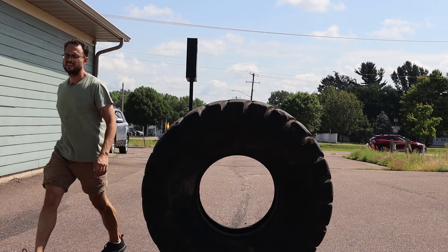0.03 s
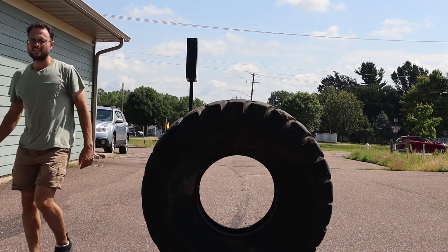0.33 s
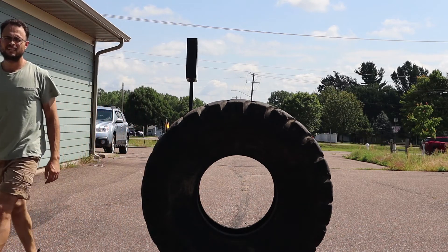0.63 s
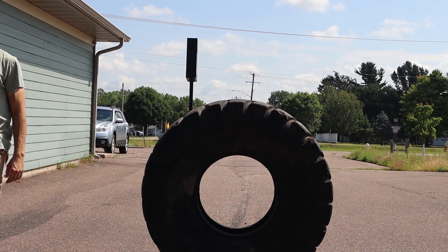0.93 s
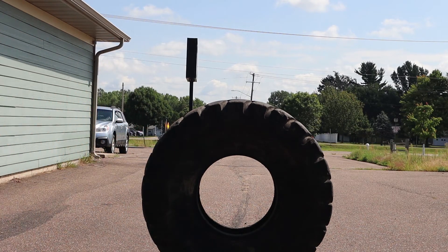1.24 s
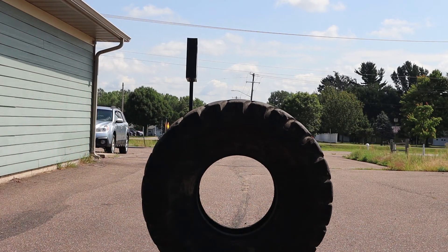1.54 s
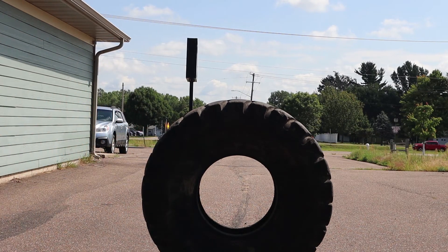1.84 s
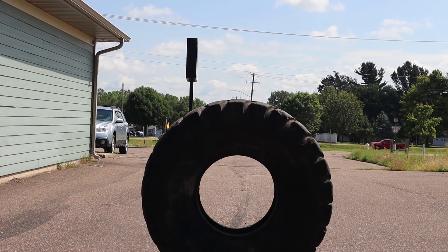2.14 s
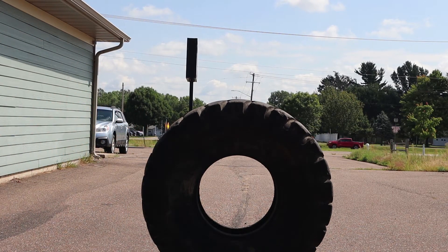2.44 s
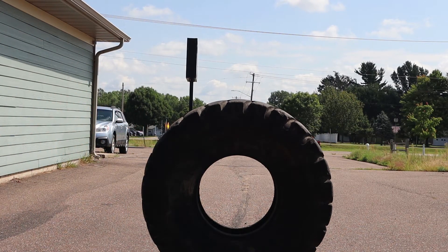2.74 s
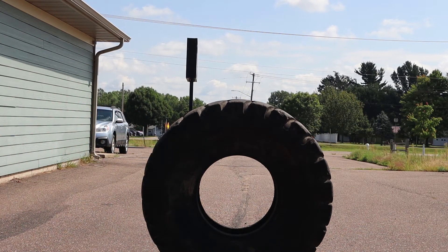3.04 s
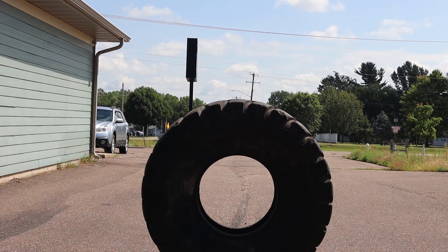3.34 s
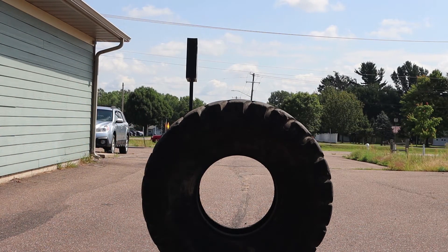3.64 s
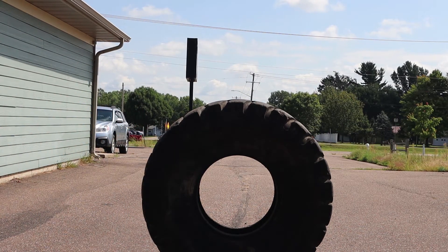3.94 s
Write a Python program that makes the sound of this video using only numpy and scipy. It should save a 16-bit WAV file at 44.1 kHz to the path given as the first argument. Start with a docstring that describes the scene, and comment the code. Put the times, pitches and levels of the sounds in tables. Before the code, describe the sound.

Low wind rumble on the microphone, with far-off traffic and faint shoe scuffs behind.

```python
"""Wind on a microphone: gusts break into eddies, with sharper slaps and one dull thump.
Behind it, a paved lot in summer: distant tyre noise, a steady machine hum, faint rustling,
crickets and a higher insect in the grass. Someone walks off over asphalt, soles scuffing
and cracking grit. The microphone is mono in the bass and very wide in the treble."""
import sys
import numpy as np
from scipy import signal
from scipy.fft import rfft, irfft, next_fast_len
from scipy.io import wavfile
from scipy.ndimage import uniform_filter1d, map_coordinates

SR = 44100
rng = np.random.default_rng(int(sys.argv[2]) if len(sys.argv) > 2 else 0)


def store_wav(level_fs):
    """Save 16-bit WAV to argv[1]."""
    pcm = np.round(np.clip(np.atleast_2d(level_fs), -1, 1) * 32767)
    wavfile.write(sys.argv[1], SR, pcm.T.astype(np.int16))


N = 176400
T = np.arange(N) / SR

# wind strength: t/s, level/dB
GUST_LEVELS = [(0,-43),(.38,-44),(.5,-30.5),(.6,-45.5),(1,-39.5),(1.36,-43),(1.45,-24),(1.53,-34),(1.64,-31),(1.7,-21.5),(1.765,-24),(1.795,-26.5),(1.83,-25.5),(1.86,-31),(1.91,-17.5),(1.935,-31.5),(1.96,-18),(1.99,-32),(2.05,-36),(2.19,-31.5),(2.24,-41),(2.49,-40),(2.535,-25.5),(2.56,-35),(2.62,-28.5),(2.69,-24),(2.77,-36),(2.9,-33.5),(3.05,-33.5),(3.12,-22),(3.22,-35),(3.335,-23),(3.38,-32),(3.445,-23.5),(3.475,-34),(3.53,-27),(3.555,-32.5),(3.605,-22),(3.675,-37),(3.73,-30),(3.8,-35.5),(3.91,-28),(4,-39.5)]
# spectrum of a small eddy: f/Hz, relative level/dB
EDDY_SPECTRUM = [(22,-33),(45,-12),(80,-4),(160,0.5),(330,1.5),(550,-4.5),(900,-17.5),(1300,-29),(2200,-41.5),(4500,-82)]
# tyre noise: t/s, relative level/dB
ROAD_LEVELS = [(0,-34),(.7,-38),(1.3,-37.5),(2.1,-39.5),(2.9,-41.5),(4,-42)]
# tyre noise: f/Hz, relative level/dB
ROAD_SPECTRUM = [(20,-25),(50,-4),(100,-2.5),(160,-0.5),(300,-12),(480,-0.5),(750,1.5),(1100,-6),(1900,-11.5),(2600,-20),(4000,-29.5),(8000,-43.5),(15000,-89)]
# machine tones: f/Hz, level/dB
HUM_TONES = [(151,-53),(474,-50),(586.8,-44.5)]
# grass and trees: f/Hz, relative level/dB
RUSTLE_SPECTRUM = [(800,-12),(2500,0),(4000,-1),(5600,-5),(8500,-14),(12000,-16.5),(15500,-32)]
# sole scuffs: t/s, level/dB, half length/s, tilt/(dB per octave)
SCUFFS = [(0.024,-50.5,0.025,-7.5),(0.115,-58,0.007,4),(0.788,-57,0.0081,2),(0.827,-46,.012,-9.5),(1.523,-51.5,0.02,-3.5),(2.085,-55,0.048,-3),(2.793,-49,0.019,-5),(2.86,-61,.028,7),(3.393,-53,0.091,-5.5)]
# scraped grit: f/Hz, relative level/dB
GRIT_SPECTRUM = [(500,-25),(2500,0),(8000,-4),(12000,-8),(15500,-18)]
# cricket chirps: start t/s, f/Hz, relative level/dB
CHIRPS = [(.09,4640,-62.5),(.33,4870,-69),(.74,4980,-64),(.97,4630,-63),(1.19,4980,-61.5),(1.56,5040,-66),(1.86,4670,-64),(2.14,4720,-60.5),(2.26,5000,-65),(2.47,4710,-61),(2.86,4550,-65),(3.07,4830,-63),(3.21,4650,-65),(3.55,4600,-64)]
# cracking grains: t/s, relative level/dB, centre f/Hz
CRACKS = [(0.8141,-24.5,2120),(1.481,-41,6500),(1.51,-30,6630),(1.525,-24,2500),(2.0197,-35.5,7560),(2.5413,-35.5,8340),(2.7744,-21.5,2600),(2.7832,-29.5,4530)]
# hard eddies: t/s, relative level/dB, nominal f/Hz
SLAPS = [(0.963,-16.5,120),(1.7091,-9.5,356),(1.7122,-6.5,297),(1.746,-10.5,330),(1.821,-5.5,442),(1.8405,-3,300),(1.889,-19,495),(1.909,-10,447),(1.952,-11.5,477),(1.959,-11.5,450),(1.969,-12,450),(2.184,-16,292),(2.566,-16.5,200),(2.641,-16.5,285),(2.683,-17,480),(2.747,-15,400),(2.854,-17,364),(2.959,-16.5,450),(3.023,-16,300),(3.091,-8,576),(3.094,-9,347),(3.19,-11.5,350),(3.301,-14,288),(3.333,-13.5,422),(3.4128,-7.5,426),(3.437,-14.5,700),(3.447,-12.5,357),(3.526,-13,610),(3.571,-13,417),(3.596,-14,323),(3.612,-6.5,467),(3.624,-9.5,420),(3.752,-19,300),(3.929,-11.5,377)]
# insect bursts: t/s, level/dB
BUZZES = [(2.36,-70),(2.585,-68),(3.019,-64.5),(3.47,-70)]
# air torn by the thump: f/Hz, relative level/dB
PUFF_SPECTRUM = [(60,-10),(330,3.5),(750,2.5),(1150,6.5),(1800,-21),(2800,-26.5),(3600,-57)]
# stereo width: f/Hz, side minus mid level/dB
STEREO_WIDTH = [(200,-55),(400,-51),(700,-30),(1290,-10.5),(2380,0),(4400,6),(8000,10.5),(15000,11.5)]

EDDY_PITCH_RATIO = .61  # trailing eddy over the one before


def amp(db):
    """Decibels to gain."""
    return 10 ** (np.asarray(db) / 20)


def unit(x):
    """Scale to rms 1."""
    return x / np.sqrt(np.mean(x ** 2) + 1e-20)


def gain_at(spectrum, hz):
    """Gain from (f/Hz, level/dB) rows, on a log frequency axis."""
    row_hz, row_db = np.transpose(spectrum)
    return amp(np.interp(np.log(hz + 1), np.log(row_hz + 1), row_db))


def curve(rows):
    """(t/s, value) rows to one value per sample."""
    return np.interp(T, *np.transpose(rows))


def wobble(knots_per_s):
    """Smooth random curve."""
    return map_coordinates(rng.standard_normal(int(N * knots_per_s / SR) + 4), [T * knots_per_s])


def swell(at_s, half_s):
    """Gaussian envelope."""
    return np.exp(-.5 * ((T - at_s) / half_s) ** 2)


def filtered(x, response):
    """Apply a frequency response."""
    size = next_fast_len(N + SR // 4)
    return irfft(rfft(x, size) * response(np.fft.rfftfreq(size, 1 / SR)), size)[..., :N]


def noise_pair(spectrum, patchy_db):
    """Two coloured noises with patches of random gain, rms 1."""
    bins = signal.stft(rng.standard_normal((2, N)), nperseg=512)[2]
    patches = uniform_filter1d(uniform_filter1d(rng.standard_normal(bins.shape[1:]), 4, 0), 18, 1)
    pair = signal.istft(bins * amp(patchy_db * unit(patches)), nperseg=512)[1][:, :N]
    return unit(filtered(pair, lambda hz: gain_at(spectrum, hz)))


def rasp_pair(hz, band_hz):
    """Two fuzzy tones on one pitch, rms 1."""
    phase = 2 * np.pi * np.cumsum(hz * np.ones(N)) / SR
    pair = [wobble(2 * band_hz) * np.sin(phase) + wobble(2 * band_hz) * np.cos(phase) for _ in range(2)]
    return unit(np.array(pair))


def wind(eddies_per_s=480, spread_db=4.5, hold_s=.04, calm_db=-30.5, strong_db=-22, calm_top_hz=300):
    """Stream of small, uneven eddies; stronger gusts are louder and brighter."""
    level_db = curve(GUST_LEVELS) + 1.48 * wobble(40)
    hits = rng.random(N) < eddies_per_s / SR
    sizes = np.sign(rng.standard_normal(N)) * amp(spread_db * np.clip(rng.standard_normal(N), -2, 1.5))
    stream = filtered(hits * sizes, lambda hz: 1j * gain_at(EDDY_SPECTRUM, hz))
    local_power = np.abs(filtered(stream ** 2, lambda hz: np.exp(-(hz * hold_s) ** 2)))
    bright = stream / np.sqrt(local_power + 1e-20)
    dull = unit(filtered(bright, lambda hz: 1 / np.sqrt(1 + (hz / calm_top_hz) ** 4)))
    force = np.clip((level_db - calm_db) / (strong_db - calm_db), 0, 1)
    return amp(level_db) * (force * bright + (1 - force) * dull)


def traffic(gain_db=3):
    """Tyre noise, fading as cars draw away."""
    level_db = curve(ROAD_LEVELS) + gain_db + .55 * wobble(4.16)
    return amp(level_db) * noise_pair(ROAD_SPECTRUM, patchy_db=1)


def machine_hum(drift_hz=2.42, wobble_db=1.4):
    """Distant machine: steady, slightly wavering tones."""
    hum = np.zeros(N)
    for hz, db in HUM_TONES:
        peak = np.sqrt(2) * amp(db + wobble_db * wobble(5.3))
        hum += peak * np.sin(2 * np.pi * np.cumsum(hz + drift_hz * wobble(14)) / SR)
    return hum


def rustle(level_db=-59):
    """Faint hiss of grass and trees."""
    return amp(level_db + 1.2 * wobble(7.26)) * noise_pair(RUSTLE_SPECTRUM, patchy_db=2)


def insect_chorus(level_db=-63):
    """Insects merged into one steady band."""
    return amp(level_db) * rasp_pair(hz=4800, band_hz=450)


def scuffs(rough_db=3.5, tilt_from_hz=500):
    """Soles scrape loose grit, dull or bright."""
    grit = noise_pair(GRIT_SPECTRUM, patchy_db=1) * unit(amp(rough_db * wobble(500)))
    pair = np.zeros((2, N))
    for at_s, db, half_s, db_per_octave in SCUFFS:
        tilted = filtered(grit, lambda hz: amp(db_per_octave * np.log2(np.maximum(hz, tilt_from_hz))))
        pair += amp(db) * swell(at_s, half_s) * unit(tilted)
    return pair


def crickets(chirp_s=.19, syllables_per_s=27, fall_hz=428, gain_db=6):
    """Each chirp is a train of syllables falling in pitch."""
    pitch_hz, envelope = np.full(N, CHIRPS[0][1], float), np.zeros(N)
    for start_s, hz, db in CHIRPS:
        on = (T >= start_s) & (T < start_s + chirp_s)
        age_s = T[on] - start_s
        syllable_phase = age_s * syllables_per_s % 1
        pitch_hz[on] = hz - fall_hz * (syllable_phase - .5)
        arch = np.sqrt(np.abs(np.sin(np.pi * age_s / chirp_s)))
        envelope[on] = amp(db + gain_db) * np.sin(np.pi * syllable_phase) * arch
    return envelope * rasp_pair(pitch_hz, band_hz=270)


def grain_crack(at_s, db, centre_hz, half_band_octaves=.5, decay_s=.0011, gain_db=-6):
    """One grain cracks underfoot: a short burst of band noise."""
    age_s = np.arange(1024) / SR
    octaves = np.log2((np.fft.rfftfreq(len(age_s), 1 / SR) + 1) / centre_hz)
    white = rng.standard_normal((2, len(age_s)))
    band = unit(irfft(rfft(white) / (1 + (octaves / half_band_octaves) ** 6)))
    burst = amp(db + gain_db) * band * np.exp(-age_s / decay_s)
    return np.pad(burst, ((0, 0), (round(at_s * SR), N)))[:, :N]


def eddy(at_s, nominal_hz):
    """One vortex crosses the microphone: suction, then pressure; peak 1."""
    near, pressure = np.abs(T - at_s) < 2 / nominal_hz, np.zeros(N)
    position = .93 * 2 * np.pi * nominal_hz * (T[near] - at_s)
    pressure[near] = 2 * np.tanh(position) / np.cosh(position)
    return pressure


def port_response(hz, low_cut_hz=140, q=.69, top_hz=1080):
    """Band-pass of the microphone port on hard eddies."""
    high_pass = hz ** 2 / (hz ** 2 - low_cut_hz ** 2 - 1j * hz * low_cut_hz / q)
    return high_pass / np.sqrt(1 + (hz / top_hz) ** 4)


def slaps(wake_db=-8.5, mean_lag_s=.007):
    """Hard eddies, each trailed by a weaker, wider one."""
    pressure = np.zeros(N)
    for at_s, db, hz in SLAPS:
        wake = eddy(at_s + mean_lag_s * (.5 + rng.random()), hz * EDDY_PITCH_RATIO)
        pressure += amp(db) * (eddy(at_s, hz) + amp(wake_db) * wake)
    return filtered(pressure, port_response)


def insect_buzz(half_s=.025):
    """A higher insect buzzes in short bursts."""
    envelope = sum(amp(db) * swell(at_s, half_s) for at_s, db in BUZZES)
    return envelope * rasp_pair(hz=8240, band_hz=140)


def thump(at_s=2.6655, middle_hz=485, gap_s=.001924, eddy_gain_db=-2, puff_db=-12):
    """Three ever wider eddies inside a puff of torn air."""
    eddies = sum(eddy(at_s + k * gap_s, middle_hz * EDDY_PITCH_RATIO ** k) for k in (-1, 0, 1))
    body = filtered(amp(eddy_gain_db) * swell(at_s, half_s=.0045) * eddies, port_response)
    air = unit(filtered(rng.standard_normal(N), lambda hz: gain_at(PUFF_SPECTRUM, hz)))
    return body + amp(puff_db) * swell(at_s, half_s=.0029) * air


def across_ports(pressure, corner_hz=550, side_db=-19):
    """Wind strikes the two ports slightly unequally, more so above the bass."""
    imbalance = pressure * wobble(160)
    side = amp(side_db) * filtered(imbalance, lambda hz: hz ** 2 / (hz ** 2 + corner_hz ** 2))
    return np.array([pressure + side, pressure - side])


def widened(pair):
    """Two unrelated signals as mid and side; wider with frequency."""
    side = filtered(pair[1], lambda hz: gain_at(STEREO_WIDTH, hz))
    return np.array([pair[0] + side, pair[0] - side])


def scene():
    """Wind on the microphone over the sounds of the lot."""
    foliage = rustle()
    buffeting = across_ports(wind() + slaps() + thump())
    distance = widened(traffic()) + machine_hum()
    insects = insect_chorus() + crickets() + insect_buzz()
    footsteps = scuffs() + sum(grain_crack(*row) for row in CRACKS)
    return buffeting + distance + widened(foliage + insects + footsteps)


def record(dry, ceiling=.97, top_hz=15800):
    """Soft clip near full scale, then band limit."""
    rounded = dry / (1 + np.abs(dry / ceiling) ** 8) ** (1 / 8)
    return filtered(rounded, lambda hz: hz < top_hz)


dry = scene()
out = record(dry)
store_wav(out)
```